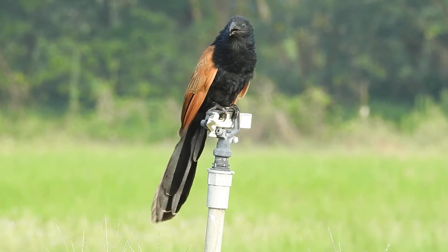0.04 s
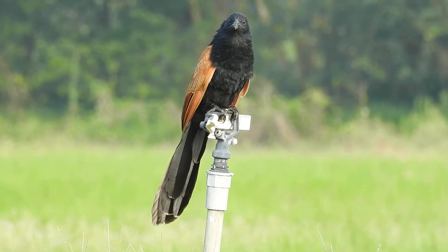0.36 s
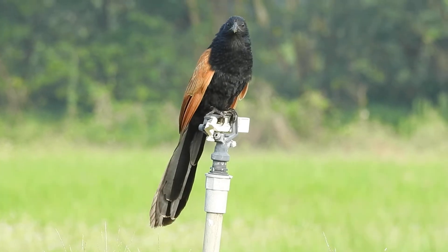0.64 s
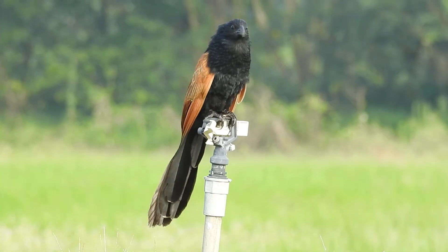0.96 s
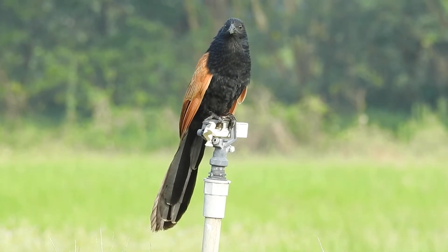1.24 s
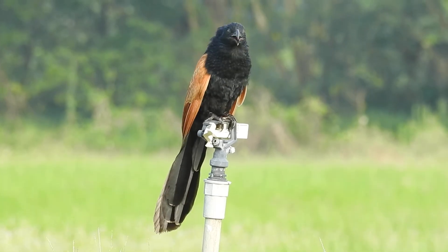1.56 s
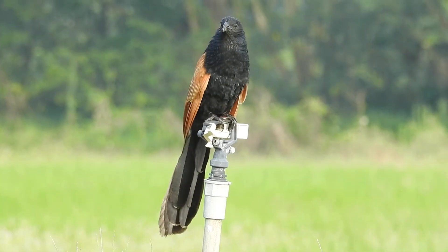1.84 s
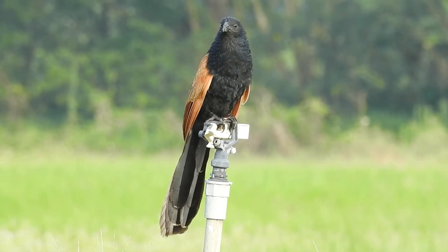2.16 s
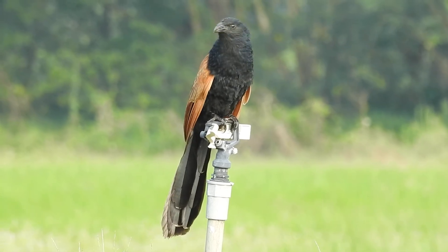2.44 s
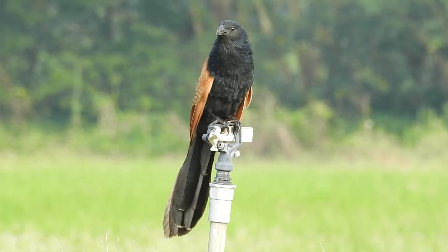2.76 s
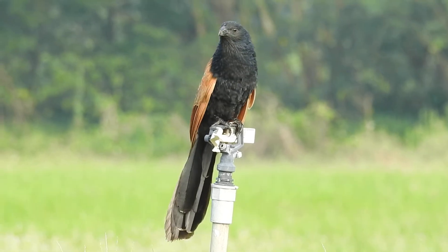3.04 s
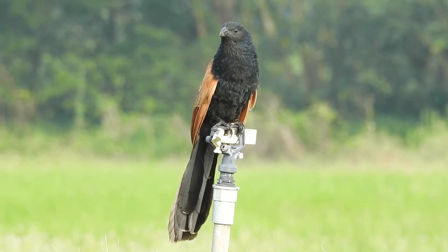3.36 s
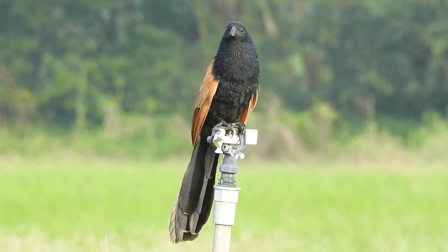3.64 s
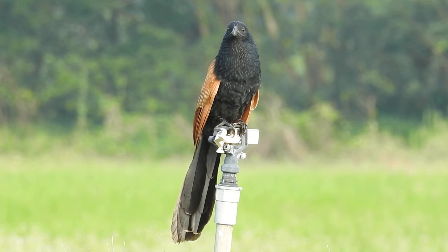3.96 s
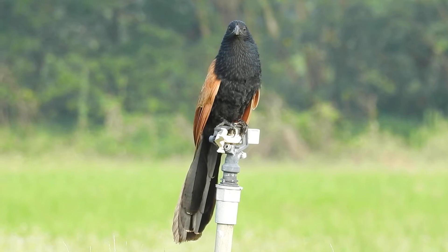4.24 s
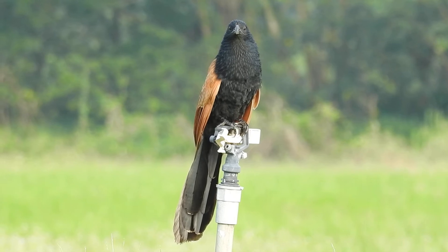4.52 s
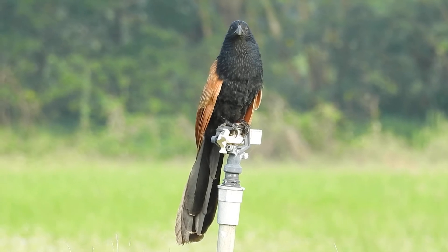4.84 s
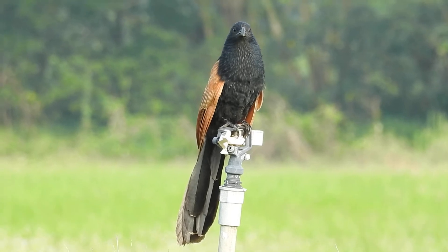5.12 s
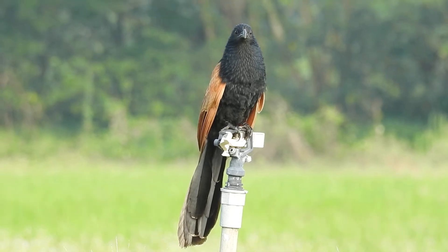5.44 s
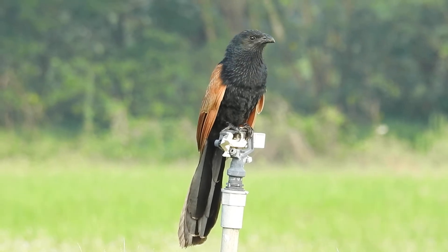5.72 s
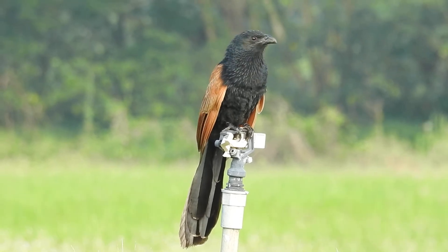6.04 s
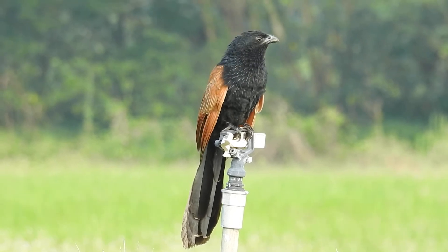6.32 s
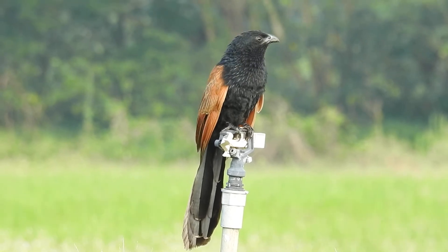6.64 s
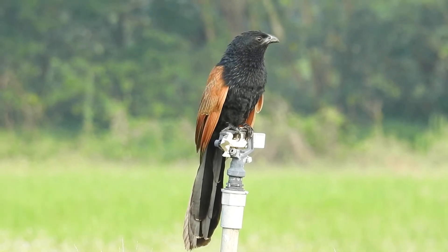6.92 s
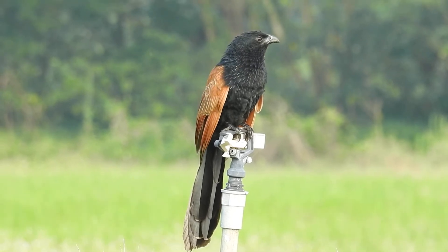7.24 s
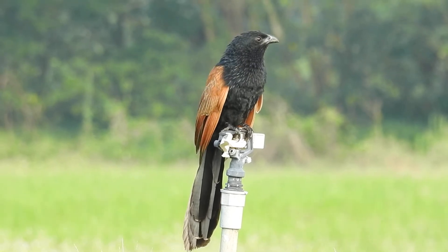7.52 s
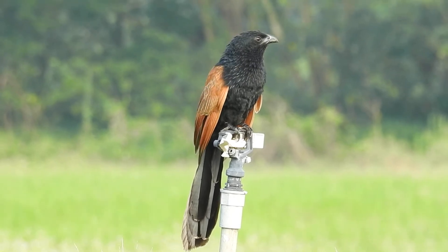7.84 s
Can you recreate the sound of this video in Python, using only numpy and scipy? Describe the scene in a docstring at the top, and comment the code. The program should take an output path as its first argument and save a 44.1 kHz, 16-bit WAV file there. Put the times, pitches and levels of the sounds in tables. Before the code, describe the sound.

A bird close to the microphone in an open field gives four quick triple hoots, at about 0.1, 0.8, 1.6 and 2.6 seconds. Each note is a very short, nearly pure, falling tone; the first two are stronger and faintly raspy, the third softer. These are the loudest sounds and do not return after 3 seconds.

Throughout, several kinds of crickets buzz and chirp in high bursts over a far chorus that gently swells and sinks. One ticks in short phrases, then trills continuously from about 4 seconds to the end at 8. Further off, two small birds trade thin descending whistled phrases, the clearer one near 2, 4 and 6 seconds, with scattered chips and twitters. A faint dull knock comes near 4 seconds and a faint far drone around 6. Distant traffic and an engine rumble steadily under everything, with a soft rush of air.

```python
"""A coucal on a post in a field gives four quick triple hoots, each note a nearly pure falling
throat tone with a faint rasp. Six kinds of crickets buzz and chirp with their wings over a far
chorus, and two small birds trade descending whistled phrases further off.
Distant traffic and an engine rumble under everything."""
import sys
import numpy as np
from scipy import signal
from scipy.fft import rfft, irfft
from scipy.io import wavfile

SR = 44100
rng = np.random.default_rng(int(sys.argv[2]) if len(sys.argv) > 2 else 0)


def wav_out(sig):
    """Save sig, one row per channel (or a flat mono array), as 16-bit PCM at SR to the path in sys.argv[1]."""
    wavfile.write(sys.argv[1], SR, np.round(np.clip(np.atleast_2d(sig).T, -1, 1) * 32767).astype(np.int16))


N = 351918
TIME = np.arange(N) / SR
FREQS = np.maximum(np.fft.rfftfreq(N, 1 / SR), 1)

# Coucal notes, three per call. Main lobe: t/s, length/s, peak/dB, f/Hz, skew (<1 peaks early);
# first lobe: level/dB; last lobe: delay/s, level/dB
HOOTS = [(0.0995, 0.032, -11, 881, 0.93, -18.5, .024, -22), (.174, .019, -11.5, 851, 0.68, -35, 0.014, -19),
         (.277, 0.0091, -21.5, 782, 1, -37, 0.0063, -35), (.815, 0.019, -12, 895, 0.71, -28.5, 0.024, -20),
         (.892, 0.016, -11, 839, 1.1, -32, .013, -16.5),
         (.9925, .014, -19.5, 784, 0.82, -33.5, 0.011, -28.5),
         (1.624, 0.025, -11, 876, 0.53, -27.5, 0.026, -19.5),
         (1.698, 0.02, -11, 840, 0.87, -28.5, .016, -16),
         (1.796, 0.013, -16.5, 792, 0.73, -35, 0.0083, -21.5),
         (2.607, 0.035, -12.5, 867, 1.24, -16, .027, -21), (2.681, 0.022, -12, 838, 0.68, -26, .016, -20),
         (2.778, 0.0077, -16.5, 820, 0.81, -40, 0.0047, -22.5)]
# Pitch fall of notes 1-3 of a call. Main lobe: sag/Hz; last lobe: length/s, start f/Hz, end f/Hz
HOOT_FALLS = [(26, .018, 830, 705), (12.1, .016, 856, 705), (45, .012, 760, 700)]


def hoot_lobes(lead_s=.008, overlap_s=.0026, overshoot=1.06, last_skew=.75):
    """The lobes of each falling hoot: t/s, length/s, level/dB, start f/Hz, end f/Hz, skew."""
    rows = []
    for place, (sag_hz, last_s, last_from_hz, last_to_hz) in enumerate(HOOT_FALLS):
        for start, length, db, hz, skew, first_db, delay_s, last_db in HOOTS[place::3]:
            first_hz = hz * (1 + overshoot * from_db(first_db))
            rows += [(start - lead_s, lead_s + overlap_s, first_db, first_hz, first_hz, 1),
                     (start, length, db, hz, hz - sag_hz, skew),
                     (start + delay_s, last_s, last_db, last_from_hz, last_to_hz, last_skew)]
    return rows


def coucal(sag_power=1.426, scoop=.0714, scoop_s=.00367, jitter=.008, overtone_db=-46):
    """Each note is one falling hoot, heard in up to three lobes with brief dips; returns tone, phase."""
    power, weighted_hz = np.zeros(N), np.zeros(N)
    for start, length, db, from_hz, to_hz, skew in hoot_lobes():
        at, u = span(start, length)
        lobe = from_db(db) * np.abs(np.sin(np.pi * u ** skew)) ** .95
        hz = from_hz + (to_hz - from_hz) * u ** sag_power
        hz *= 1 + scoop * np.exp(-u * length / scoop_s)
        power[at] += lobe ** 2
        weighted_hz[at] += lobe ** 2 * hz
    pitch_hz = weighted_hz / (power + 1e-18)   # overlapping lobes share one pitch
    phase = phase_of(pitch_hz * (1 + jitter * drift(200)))
    return np.sqrt(power) * (np.sin(phase) + from_db(overtone_db) * np.sin(2 * phase)), phase


def hoot_bandpass(tone, band_hz=(570, 2400)):
    """Band-pass that keeps the hoot smooth and free of edge clicks."""
    return signal.sosfilt(signal.butter(4, band_hz, "band", fs=SR, output="sos"), tone)


# Rasp on notes 1 and 2 of a call: delay/s, level re note/dB
RASPS = [(.004, -25), (.009, -32)]
# Rasp hiss: f/Hz, relative density/dB
HISS_SPECTRUM = [(1500, -8), (3300, -10), (4600, -12), (7600, -2), (11000, -14.5)]


def rasp(hoot_phase, t60_s=.12, rise_s=.0022, sag=.17, lower_hz=4550, upper_hz=7500):
    """Rough squeak on the strong notes: two sagging resonances and hiss, pulsing at the hoot's pitch."""
    level, glide = np.zeros(N), np.ones(N)
    for place, (delay_s, rasp_db) in enumerate(RASPS):
        for start, _, db, *_ in HOOTS[place::3]:
            at, u = span(start + delay_s, t60_s)
            level[at] += from_db(db + rasp_db - 60 * u) * (1 - np.exp(-u * t60_s / rise_s))
            glide[at] = 1 + sag * (np.exp(-10 * u) - .3)
    lower = rough_tone(lower_hz * glide, width_hz=300)
    upper = from_db(-11) * rough_tone(upper_hz * glide, width_hz=86)
    hiss = from_db(-6) * noise(HISS_SPECTRUM)
    flutter = 1 + .32 * np.sin(hoot_phase)
    return level * flutter * (lower + upper + hiss)


def cricket(bursts, stroke_hz, pitch_hz, fall, duty, swell_db, attack_s, pan_db, unsteady=.008, flick=0):
    """Each wing stroke is a falling tone lingering at the wing's resonance; bursts stop dead."""
    out = np.zeros(N)
    pace = 1 + 4 * unsteady * drift(43)
    waver = 1 + unsteady * drift(127)
    flicker = from_db(1.1 * drift(80))
    for start, end, db in bursts:
        at, u = span(start, end - start)
        cycle = np.cumsum(stroke_hz * pace[at] / SR) % 1
        stroke = np.minimum(cycle / duty, 1)
        slide = 1 - 2 * stroke
        bend = (slide + 1.5 * slide ** 3) / 3 - flick * stroke ** 6   # flick: extra fall at stroke end
        hz = pitch_hz * waver[at] * (1 + fall * bend)
        level = from_db(db - swell_db * (1 - u) ** 3)
        level *= np.minimum(1, (TIME[at] - start) / attack_s)
        level *= np.minimum(1, (end - TIME[at]) / .004)
        out[at] += 2 * level * np.sin(np.pi * stroke) ** 2 * np.sin(phase_of(hz))
    return scatter(pan(out * flicker, pan_db), t60_s=.06, wet_db=-6, width=2)


def chirp_runs(runs, every_s, length_s, db):
    """Evenly spaced chirps: start/s, end/s, level/dB."""
    return [(t + k * every_s, t + k * every_s + length_s, db) for t, count in runs for k in range(count)]


# Bursts of two loud crickets of one kind, sometimes overlapping: end/s, final level/dB
LOUD_BURSTS = [(.125, -36), (1.59, -38), (3.33, -35.5), (3.42, -38), (4.3, -47.5), (5.97, -38.5),
               (6.07, -37), (7.929, -39)]
# Upper cricket's bursts: start/s, end/s, final level/dB
UPPER_BURSTS = [(3.25, 3.78, -48.5), (4.3, 4.87, -47.5), (7, 7.42, -47)]
# Ticking cricket, short phrases then a long trill: start/s, end/s
TICK_PHRASES = [(.18, .29), (.62, .73), (1.06, 1.16), (2.11, 2.26), (2.57, 2.68), (2.82, 2.89),
                (3.4, 3.515), (3.575, 3.72), (3.75, 4.14), (4.21, 8)]
# Chirp runs of the high and the low cricket: t/s, count
HIGH_RUNS = [(1.17, 4), (4.94, 4)]
LOW_RUNS = [(.11, 3), (1.165, 7), (2.88, 1), (3.467, 4), (5.25, 1), (6.26, 1), (6.68, 3)]


def near_crickets(loud_s=.43, middle_s=.62, middle_every_s=1.519):
    """Six kinds of cricket, each with its own wing resonance and stroke rate."""
    loud = [(end - loud_s, end, db) for end, db in LOUD_BURSTS]
    middle = [(end - middle_s, end, -42) for end in np.arange(.29, N / SR, middle_every_s)]
    high = chirp_runs(HIGH_RUNS, every_s=.372, length_s=.2, db=-47.5)
    low = chirp_runs(LOW_RUNS, every_s=.168, length_s=.092, db=-52)
    ticks = [(start, end, -46) for start, end in TICK_PHRASES]
    return (cricket(loud, stroke_hz=115, pitch_hz=5875, fall=.2, duty=.68,
                    swell_db=2, attack_s=.12, pan_db=2, unsteady=.013, flick=.6)
            + cricket(middle, stroke_hz=140, pitch_hz=6375, fall=.0502, duty=.93,
                      swell_db=14, attack_s=.066, pan_db=1, unsteady=.0049)
            + cricket(UPPER_BURSTS, stroke_hz=110, pitch_hz=6800, fall=.099, duty=.81,
                      swell_db=-1, attack_s=.11, pan_db=2)
            + cricket(high, stroke_hz=109, pitch_hz=7150, fall=.13, duty=.65,
                      swell_db=-1, attack_s=.034, pan_db=-3)
            + cricket(ticks, stroke_hz=62, pitch_hz=6028, fall=.065, duty=.64,
                      swell_db=1, attack_s=.015, pan_db=1.5, unsteady=.005)
            + cricket(low, stroke_hz=69, pitch_hz=5140, fall=.14, duty=.82,
                      swell_db=1, attack_s=.0059, pan_db=-3))


def song_notes(phrase, songs, pitch_spread=.0068, spread_db=2):
    """A phrase repeated, its notes a little different in pitch and level each time."""
    rows = []
    for start, db in songs:
        for delay_s, length, from_hz, middle_hz, to_hz, note_db in phrase:
            head, tail, loud = rng.standard_normal(3)
            rows.append((start + delay_s, length, from_hz * (1 + pitch_spread * head), middle_hz,
                         to_hz * (1 + pitch_spread * tail), db + note_db + spread_db * loud))
    return rows


# Phrases of the first bird and the further, answering one:
# offset/s, length/s, start f/Hz, middle f/Hz, end f/Hz, relative level/dB
SONG_PHRASE = [(-.135, 0.04, 4680, 4350, 4100, -0.5), (-.068, 0.036, 2920, 3270, 3430, -4.5),
               (0, 0.04, 4370, 4180, 4340, -3), (.055, 0.039, 4350, 3980, 3270, 1.5),
               (.145, .072, 3900, 3990, 3450, 4), (.274, .096, 3450, 3690, 3080, -3),
               (.415, .076, 2860, 3440, 2800, -4.5)]
ANSWER_PHRASE = [(-.115, .05, 4770, 4660, 4100, 2.5), (0, 0.0534, 4530, 4230, 4180, 0.5),
                 (.052, 0.069, 4250, 4200, 3650, -0.5), (.168, .08, 3950, 4020, 3830, 2.5),
                 (.278, .088, 3010, 3470, 2850, -6)]
# When each is sung: t/s, level/dB
SONGS = [(2.013, -46.5), (4.178, -48.5), (6.123, -48.5)]
ANSWERS = [(1.008, -54.5), (2.764, -51.5), (4.195, -54.5), (5.691, -53.5), (7.136, -53)]
# Single bird notes: t/s, length/s, start f/Hz, middle f/Hz, end f/Hz, level/dB
LONE_NOTES = [(1.216, 0.063, 2550, 2450, 1750, -44.5), (1.586, .049, 2940, 2940, 2750, -49),
              (1.637, 0.02, 2720, 2510, 2150, -40), (1.664, 0.029, 2160, 1953, 1630, -42.5),
              (3.345, 0.043, 3500, 3020, 2830, -53), (6.627, .024, 3360, 3470, 3400, -48),
              (6.655, 0.023, 2850, 2980, 2900, -49), (7.417, 0.033, 2950, 3040, 2870, -52),
              (7.876, 0.084, 2760, 2770, 2700, -52)]


def bird_whistles(twitter_db=-66, bend_power=1.9):
    """Thin whistles that ease onto their middle pitch and bend away, over far random twitter."""
    notes = song_notes(SONG_PHRASE, SONGS) + song_notes(ANSWER_PHRASE, ANSWERS) + LONE_NOTES
    for when, long, high, loud, *bend in rng.random(size=(100, 7)):
        contour_hz = 2400 + 2200 * high + 800 * (np.array(bend) - .5)
        notes.append((when * N / SR, .015 + .03 * long, *contour_hz, twitter_db + 6 * loud))
    out = np.zeros(N)
    waver = 1 + .0035 * drift(150)
    for start, length, from_hz, middle_hz, to_hz, db in notes:
        at, u = span(start, length)
        edge_hz = np.where(u < .5, from_hz, to_hz)
        hz = middle_hz + (edge_hz - middle_hz) * np.abs(2 * u - 1) ** bend_power
        out[at] += from_db(db) * np.cbrt(4 * u * (1 - u)) * np.sin(phase_of(hz * waver[at]))
    return out * from_db(3 * drift(110))


# Bird chips: t/s, f/Hz, level/dB
CHIPS = [(1.39, 3400, -48), (1.53, 4470, -53), (1.76, 3320, -48.5), (3.85, 4400, -50.5)]


def bird_chips(length_s=.055, fall=.134):
    """Harsh chips: short swells of narrow noise, falling in pitch."""
    level, pitch_hz = np.zeros(N), np.zeros(N)
    for start, hz, db in CHIPS:
        at, u = span(start, length_s)
        level[at] += from_db(db) * np.sin(np.pi * u)
        pitch_hz[at] = hz * (1 + fall * (.5 - u))
    return level * rough_tone(pitch_hz, width_hz=320)


# Far cricket chorus and broad insect haze: f/Hz, relative density/dB
CHORUS_SPECTRUM = [(4800, -62), (5600, -37), (6300, -6), (6680, -1.5), (7000, -13.5), (7500, -26)]
HAZE_SPECTRUM = [(2500, -9), (3500, -8), (4500, -2.5), (5500, 3), (6800, 0), (7600, -3), (8700, 4),
                 (9300, -2.5), (10200, -17), (12000, -20), (15700, -25)]
# Chorus lulls: t/s, depth/dB
LULLS = [(.2, 5.5), (1.2, 2.5), (2.67, 5), (3.92, 9), (5.2, 8), (6.7, 5.5), (8.0, 7)]


def far_insects(chorus_db=-43.5, haze_db=-49.5, lull_width_s=.34):
    """Far crickets merge into one band that sinks every second or so, over a steady haze."""
    lull_db = sum(depth * np.exp(-((TIME - t) / lull_width_s) ** 2) for t, depth in LULLS)
    chorus = from_db(chorus_db - lull_db + .4 * drift(120)) * noise(CHORUS_SPECTRUM)
    return chorus + from_db(haze_db) * noise(HAZE_SPECTRUM)


# Traffic rumble and midrange air: f/Hz, relative density/dB
RUMBLE_SPECTRUM = [(22, -25), (46, -15), (62, -1.5), (115, -2.5), (160, -8.5), (195, -8.5), (225, -16.5),
                   (250, -18.5), (290, -27), (340, -35.5)]
AIR_SPECTRUM = [(270, -0.5), (340, -3), (385, -0.5), (470, -3), (650, 2), (900, -6), (1250, 0), (1620, -12),
                (1900, -7), (2200, -17), (3500, -23)]


def far_traffic(firing_hz=75, engine_db=-42, rumble_db=-35, air_db=-47):
    """Steady rumble, a soft rush of air and an engine whose firing note wanders."""
    firing = np.sin(phase_of(firing_hz * (1 + .01524 * drift(3.3))))
    engine = from_db(engine_db + 2 * drift(4.2)) * firing
    rumble = from_db(rumble_db) * noise(RUMBLE_SPECTRUM)
    air = from_db(air_db + 1.5 * drift(18)) * noise(AIR_SPECTRUM)
    return pan(engine + rumble + air, pan_db=-1.5)


# Knock, trill, drone: t/s, length/s, f/Hz, width/Hz, level/dB
FAINT_SOUNDS = [(3.952, 0.031, 443, 120, -41), (4.38, 0.34, 5320, 160, -54.5), (5.85, 0.9, 649, 15, -51.5)]


def faint_sounds():
    """A dull knock, a thin trill and a far drone, each a swell of narrow noise."""
    out = np.zeros(N)
    for start, length, hz, width_hz, db in FAINT_SOUNDS:
        at, u = span(start, length)
        out[at] += from_db(db) * np.sqrt(4 * u * (1 - u)) * rough_tone(np.full(N, hz), width_hz)[at]
    return out


# Stereo width of the noise: f/Hz, left-right correlation
CORRELATION = [(30, 0.94), (120, 0.99), (1500, .92), (3000, 0.58), (6000, 0.12), (8500, -0.22),
               (13000, 0.15)]


def noise(spectrum):
    """Stereo noise, wider in the treble, falling away beyond the spectrum's ends; rms 1."""
    skirt = np.minimum(1, np.minimum(FREQS / spectrum[0][0], spectrum[-1][0] / FREQS))
    gain = from_db(over_freqs(spectrum)) * skirt ** 10
    alike = over_freqs(CORRELATION)
    mid, side = rfft(rng.standard_normal((2, N)))
    stereo = np.sqrt(1 + alike) * mid + np.sqrt(1 - alike) * side * [[1], [-1]]
    return rms_one(irfft(gain * stereo, N))


def scatter(x, t60_s, wet_db, width):
    """Add the dying scatter from grass and trees."""
    t = TIME[TIME < t60_s]
    envelope = from_db(-60 * t / t60_s) * (1 - np.exp(-t / .0048))
    mid, side = rng.standard_normal((2, len(t))) * envelope
    tail = rms_one(mid + width * side * [[1], [-1]]) / np.sqrt(len(t))
    return x + from_db(wet_db) * signal.oaconvolve(np.atleast_2d(x), tail, axes=1)[:, :N]


def rough_tone(pitch_hz, width_hz):
    """Noise in a narrow resonance that follows the pitch; rms 1."""
    phase = phase_of(pitch_hz)
    return drift(width_hz) * np.sin(phase) + drift(width_hz) * np.cos(phase)


def drift(corner_hz):
    """Low-passed random wander; rms 1."""
    return rms_one(irfft(rfft(rng.standard_normal(N)) / (1 + (FREQS / corner_hz) ** 2), N))


def span(start_s, length_s):
    """An event's sample indices and its progress from 0 to 1."""
    at = np.flatnonzero((TIME > start_s) & (TIME < start_s + length_s))
    return at, np.clip((TIME[at] - start_s) / length_s, 0, 1)


def over_freqs(points):
    """Join (f/Hz, value) points on a log-frequency axis."""
    hz, value = np.transpose(points)
    return np.interp(np.log(FREQS), np.log(hz), value)


def pan(x, pan_db):
    """Stereo, left above right by pan_db."""
    return x * from_db(np.array([[.5], [-.5]]) * pan_db)


def phase_of(hz):
    """Running phase in radians."""
    return 2 * np.pi * np.cumsum(hz) / SR


def from_db(db):
    """Decibels to gain."""
    return 10 ** (np.asarray(db) / 20)


def rms_one(x):
    """Scale to rms 1."""
    return x / np.sqrt(np.mean(x ** 2) + 1e-20)


def scene():
    """The coucal close by, the field behind it."""
    tone, phase = coucal()
    hoots = pan(hoot_bandpass(tone), pan_db=-2.1)
    hoots = scatter(hoots, t60_s=.09, wet_db=-21, width=.4)
    hoots = scatter(hoots, t60_s=.98, wet_db=-31.5, width=.5)
    calls = hoots + rasp(phase)
    insects = near_crickets() + far_insects()
    birds = pan(bird_whistles() + bird_chips(), pan_db=-3)
    birds = scatter(birds, t60_s=.095, wet_db=-6, width=.35)
    return calls + insects + birds + far_traffic() + faint_sounds()


def record(dry):
    """Short fade-in, steep low-pass."""
    fade_s, cutoff_hz = .003, 15750
    lowpass = signal.ellip(10, .1, 80, cutoff_hz, fs=SR, output="sos")
    return signal.sosfilt(lowpass, dry * np.minimum(1, TIME / fade_s))


dry = scene()
out = record(dry)
wav_out(out)
```